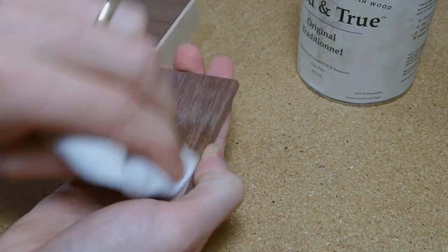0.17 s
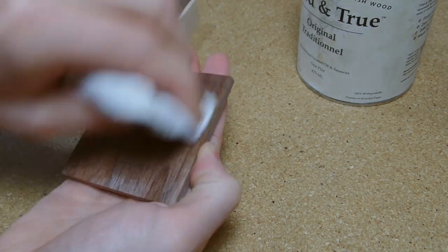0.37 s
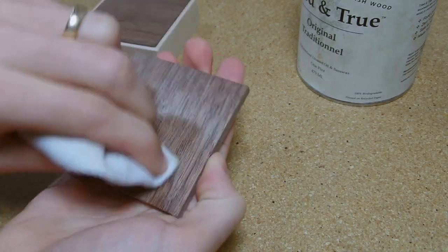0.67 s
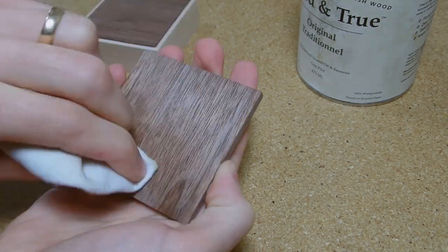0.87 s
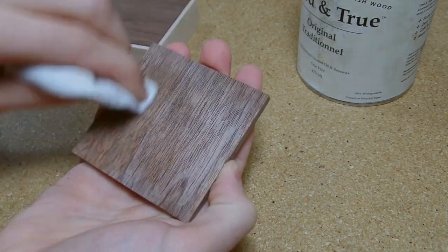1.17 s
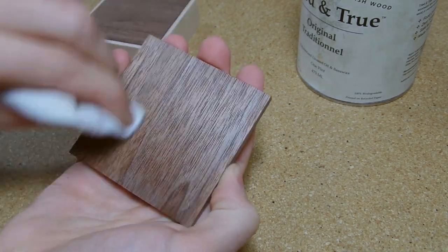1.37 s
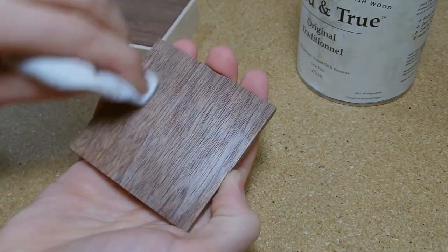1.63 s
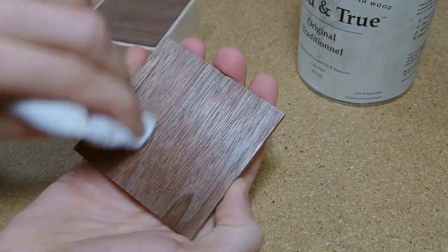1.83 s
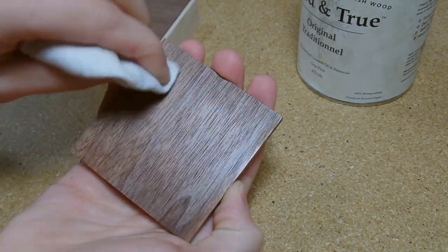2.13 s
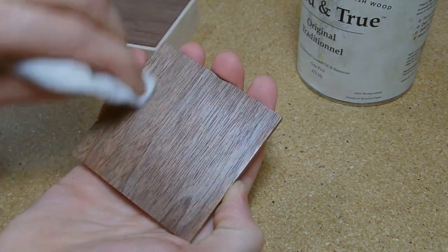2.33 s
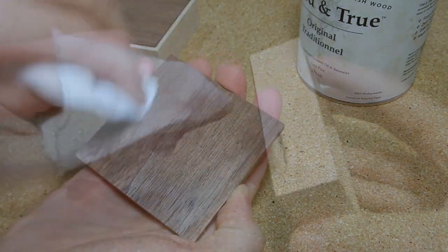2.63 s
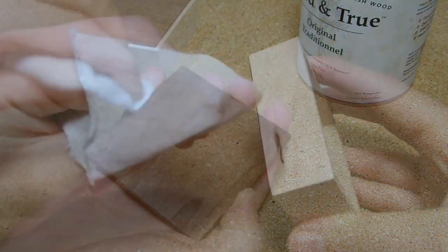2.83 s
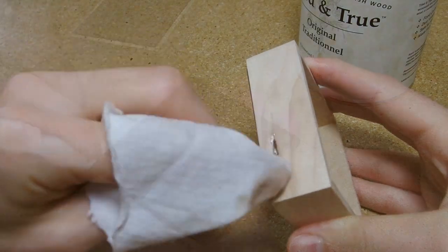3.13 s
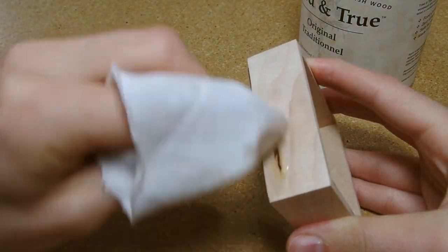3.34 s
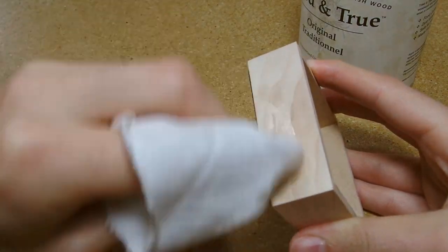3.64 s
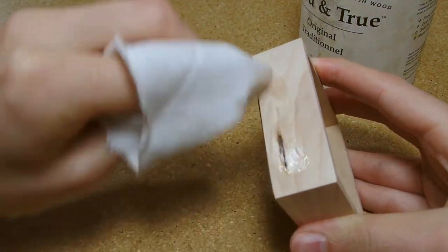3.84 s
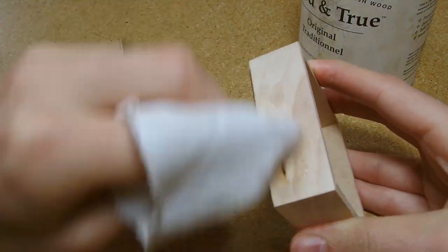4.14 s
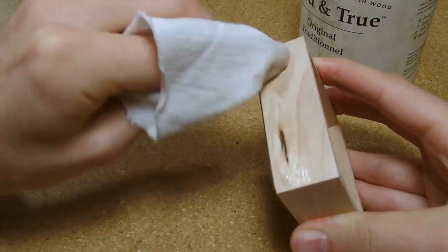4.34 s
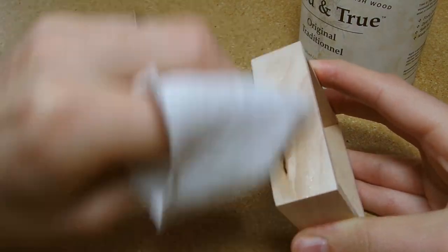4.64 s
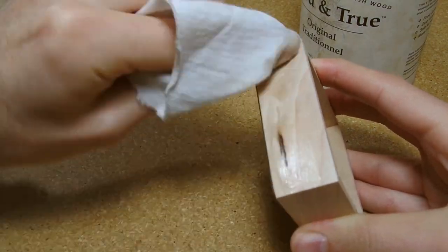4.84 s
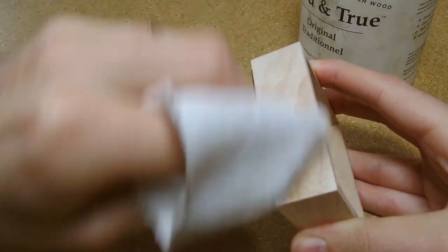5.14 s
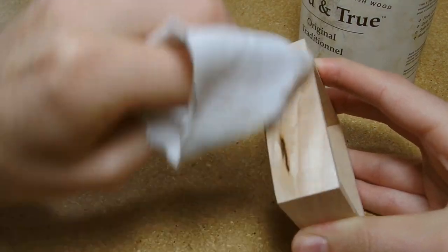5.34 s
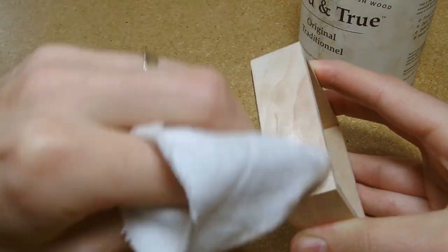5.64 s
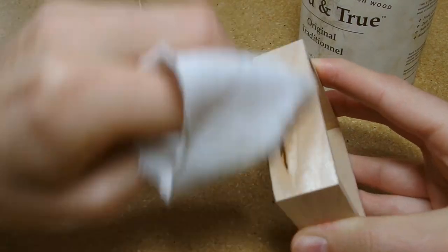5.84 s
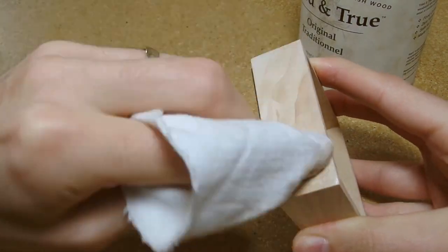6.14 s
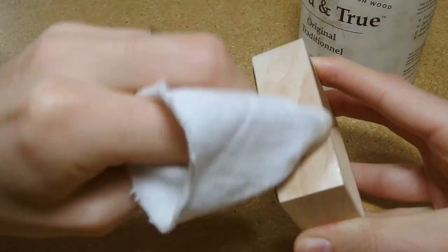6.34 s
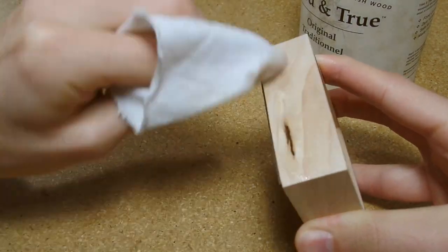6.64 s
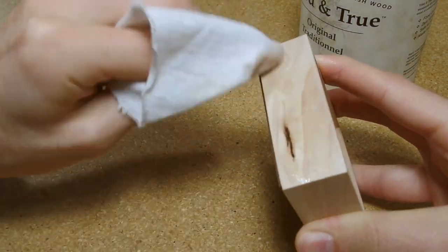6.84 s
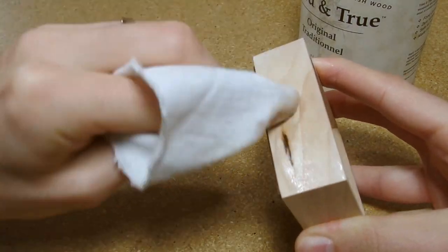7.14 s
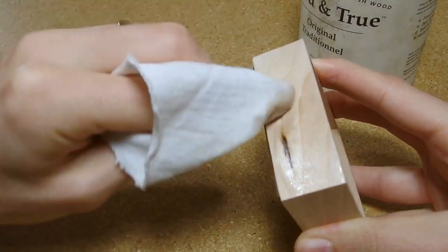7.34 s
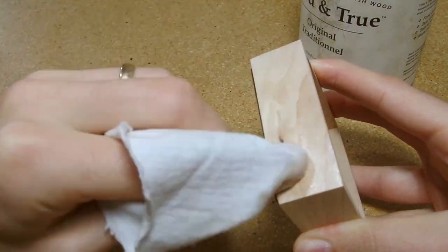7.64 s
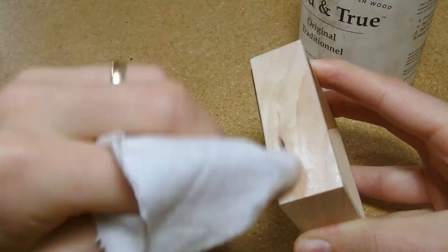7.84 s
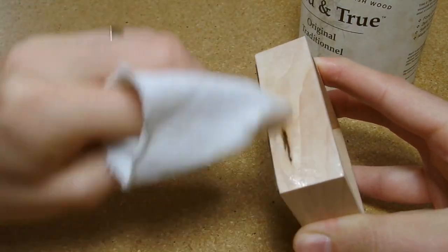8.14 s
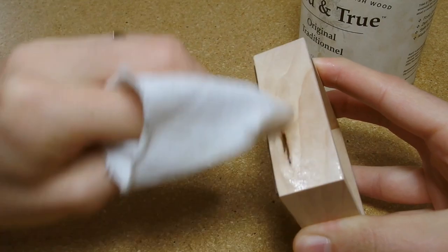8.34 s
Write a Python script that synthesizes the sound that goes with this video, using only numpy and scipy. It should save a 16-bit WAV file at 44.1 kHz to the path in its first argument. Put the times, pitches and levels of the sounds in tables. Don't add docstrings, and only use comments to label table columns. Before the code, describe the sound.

In a quiet workshop with soft hiss and low machine hum, cloth fizzes steadily back and forth over wood grain. After a short gap, hesitant dabs begin on a smaller, brighter piece, joined by soft then hard woody knocks against the bench and a couple of tiny crisp snaps. Firm regular rubbing continues, becoming shorter and uneven, dipping, then strengthening to the end. Dull scrapes occur underneath. Close, dry, mono.

```python
import sys
import numpy as np
from scipy import signal
from scipy.fft import rfft, irfft
from scipy.io import wavfile
from scipy.ndimage import uniform_filter1d

SR = 44100
rng = np.random.default_rng(int(sys.argv[2]) if len(sys.argv) > 2 else 0)


def invert_db(x):
    u = np.asarray(x, float) / 20
    return 10 ** u


def put_to_file(sound):
    columns = np.atleast_2d(sound).T
    safe = np.clip(columns, -1, 1)
    whole_steps = np.round(safe * 32767)
    wavfile.write(sys.argv[1], SR, whole_steps.astype(np.int16))


N = 374850
T = np.arange(N) / SR
HZ = np.fft.rfftfreq(N, 1 / SR)
EDGE_HZ = 15770


def evened(x):
    return x / np.sqrt(np.mean(x ** 2) + 1e-20)


def read(points, hz):
    f, value = np.transpose(points)
    return np.interp(np.log(hz + 1), np.log(f + 1), value)


def colour(x, gain):
    return irfft(rfft(x) * gain, N)


def wander(hz):
    return evened(colour(rng.standard_normal(N), 1 / (1 + (HZ / hz) ** 2)))


def add(mix, start_s, sound):
    part = mix[round(start_s * SR):][:len(sound)]
    part += sound[:len(part)]


def sine(hz, t):
    return np.sin(2 * np.pi * (hz * t + rng.random()))


# [start_s, end_s, pitch_hz, level_db]
HUM_SWELLS = [(0.56, 1.35, 147, -64), (1.3, 2.3, 145.3, -67), (2.25, 3.0, 150, -62),
              (1.737, 1.81, 319, -57), (2.7, 2.95, 301, -63), (3.25, 4.45, 134, -60),
              (5.75, 6.55, 136.3, -60), (6.75, 7.35, 136, -62), (7.9, 8.6, 136, -66),
              (2.87, 3.82, 121.3, -60), (3.92, 4.6, 120, -58), (4.622, 5.17, 119.2, -56),
              (5.28, 6.77, 117.8, -58.5), (6.9, 7.66, 119.5, -56.5), (7.702, 8.6, 119.6, -58.5),
              (-.1, 1.1, 58, -62.5), (1.899, 2.9, 57.3, -63), (3.851, 4.75, 58.6, -59),
              (5.399, 5.95, 59.7, -59.5), (6.101, 6.8, 59.5, -59.5), (7.195, 8.6, 60.2, -67)]


def hums():
    fade_s, waver_hz, swell_db = 0.069, 0.725, 1.1
    out, waver, swell = np.zeros(N), wander(4.9), wander(3.2)
    for start_s, end_s, pitch_hz, level_db in HUM_SWELLS:
        shift = rng.integers(N)
        edge_s = np.minimum(T - start_s, end_s - T)
        fade = np.clip(edge_s / np.minimum(fade_s, (end_s - start_s) / 3), 0, 1)
        on = fade > 0
        now_hz = pitch_hz + waver_hz * np.roll(waver, shift)[on]
        turns = np.cumsum(now_hz) / SR + rng.random()
        level = invert_db(level_db + swell_db * np.roll(swell, shift)[on])
        out[on] += np.sqrt(2) * fade[on] * level * np.sin(2 * np.pi * turns)
    return out


# [freq_hz, density_db_per_hz]
AIR_SPECTRUM = [(20, 3.5), (40, -2), (65, 4.5), (130, -2), (190, -11.5), (400, -10), (1200, -16),
                (2300, -18), (2700, -21), (8000, -25.5), (16500, -27)]
# [pitch_hz, level_db]
LAMP_TONES = [(1200, -69), (1320, -76)]


def workshop():
    change_s, change_length_s = 3.26, 0.57
    air_dbs, rumble_dbs = (-56, -55), (-59, -57)
    low = 1 / (1 + (HZ / 150) ** 8)
    second = np.clip((T - change_s) / change_length_s + 0.5, 0, 1)
    spectrum = invert_db(read(AIR_SPECTRUM, HZ))
    out = hums()
    for share, air_db, rumble_db in zip((1 - second, second), air_dbs, rumble_dbs):
        noise = rng.standard_normal(N)
        air = evened(colour(noise, spectrum * (1 - low))) * invert_db(air_db + 0.89 * wander(4.1))
        rumble = evened(colour(noise, spectrum * low)) * invert_db(rumble_db + 1.2 * wander(3))
        out = out + share * (air + rumble)
    for pitch_hz, level_db in LAMP_TONES:
        out = out + np.sqrt(2) * invert_db(level_db + 0.5 * wander(4)) * sine(pitch_hz, T)
    return out


# [freq_hz, level_db]
BENCH_SPECTRUM = [(100, -27), (170, 1.5), (250, -7), (330, 7.5), (420, -5.5), (660, -10.5), (800, -7),
                  (1200, -13), (2500, -18), (6000, -26)]
# [freq_hz, t60_s]
BENCH_DECAY = [(150, 0.27), (400, 0.34), (1000, 0.37), (3000, 0.05)]


def bench_noise(t, t60_scale):
    frame = dict(nperseg=512, noverlap=384)
    hz, at_s, z = signal.stft(rng.standard_normal(len(t)), SR, **frame)
    z = z * invert_db(read(BENCH_SPECTRUM, hz)[:, None])
    steady_rms = np.sqrt(np.mean(signal.istft(z, SR, **frame)[1] ** 2))
    t60_s = t60_scale * read(BENCH_DECAY, hz)[:, None]
    z = z * invert_db(-60 * at_s / t60_s)
    return signal.istft(z, SR, **frame)[1][:len(t)] / steady_rms


# [start_s, t60_s, level_db]
BENCH_SHUFFLES = [
    (0.171, 0.22, -51),
    (1.892, 0.16, -50.5),
    (2.11, 0.13, -59),
    (2.55, 0.13, -54),
    (3.0, 0.25, -63),
    (3.269, 0.31, -54.5),
    (6.22, .15, -52),
    (7.03, 0.35, -40.5),
    (7.661, 0.18, -63),
    (7.95, 0.27, -55),
]


def shuffles():
    rise_s = 0.022
    out, t = np.zeros(N), T[:SR // 3]
    for start_s, t60_s, level_db in BENCH_SHUFFLES:
        shape = np.minimum(t / rise_s, invert_db(-60 * (t - rise_s) / t60_s))
        add(out, start_s, invert_db(level_db) * shape * bench_noise(t, 30))
    return out


# [start_s, peak_db, pitch_hz]
BOX_KNOCKS = [
    (3.517, -25, 385),
    (3.785, -24.5, 386),
    (4.289, -17.5, 404),
    (4.56, -25, 404),
    (4.794, -17, 410),
    (5.044, -19, 402),
    (5.275, -17, 408),
    (5.502, -16, 412),
]
# [pitch_hz, level_db, t60_s]
RING_MODES = [(110, -15, .3), (170, -8, .25), (231, -8, .25), (325, -5, .2), (418, -1, .2), (512, -3, .2),
              (608, -4, .18), (797, -10, .18), (915, -12, .18), (1045, -21, .15), (1195, -16, .15),
              (1335, -20, .15), (1480, -22, .15), (1700, -22, .15)]


def knocks():
    out, t = np.zeros(N), T[:SR // 3]
    ring = sum(invert_db(level_db - 60 * t / t60_s) * sine(hz, t) for hz, level_db, t60_s in RING_MODES) / 2
    for start_s, peak_db, pitch_hz in BOX_KNOCKS:
        hard_db = -10.5 + 0.75 * (peak_db + 20.5)
        tail_db = -14.5 + 0.27 * (peak_db + 19.5)
        u = np.clip(t * pitch_hz / 2.764, 0, 1)
        blow = -np.sqrt(np.sin(np.pi * u)) * np.sin(2 * np.pi * pitch_hz * t * (1.1 - 0.13 * u))
        contact = np.exp(-t / 0.0057) * (1 - np.exp(-t / 0.00025))
        blow -= invert_db(hard_db) * np.sin(2 * np.pi * 800 * t) * contact
        wall = (t / 0.0078) * np.exp(1 - t / 0.0056)
        blow -= invert_db(-16) * np.sin(2 * np.pi * 590 * t) * wall
        click = signal.lfilter([0.3], [1, -0.7], rng.standard_normal(len(t))) * np.exp(-t / 0.0075)
        tail = (ring + invert_db(-5) * bench_noise(t, 1.0)) * np.clip((t - 0.006) / 0.006, 0, 1)
        sound = blow + invert_db(1.33 * hard_db - 3.5) * click + invert_db(tail_db) * tail
        add(sound, 0.0092, invert_db(-16) * blow)
        add(out, start_s + 0.00143, invert_db(peak_db) * sound)
    return out


# [start_s, level_db, pitch_hz, t60_s]
FIBRE_SNAPS = [
    (4.295, -50, 9900, 0.053),
    (4.458, -33.5, 9400, 0.065),
    (4.465, -30, 13800, 0.039),
    (4.55, -45, 9700, 0.066),
    (5.123, -36, 5500, 0.018),
    (5.595, -37, 6280, 0.0078),
]


def snaps():
    out, t = np.zeros(N), T[:3000]
    for start_s, level_db, pitch_hz, t60_s in FIBRE_SNAPS:
        noise = evened(uniform_filter1d(rng.standard_normal(len(t)), size=9))
        burst = noise * np.sin(2 * np.pi * pitch_hz * t)
        rise = np.minimum(t / (0.076 * t60_s), 1)
        add(out, start_s, invert_db(level_db - 60 * t / t60_s) * burst * rise)
    return out


def strokes(rows, grip):
    usual_db, ring_lag, scrape_lag = -45, 0.32, 0.38
    out = []
    for k, (start_s, length_s, fizz_db, *own) in enumerate(rows):
        late, ring_db, scrape_db = grip[k % 2]
        if own:
            late = own[0]
        harder_db = fizz_db - usual_db
        ring_db = ring_db - ring_lag * harder_db
        scrape_db = scrape_db - scrape_lag * harder_db
        out.append((start_s, length_s, fizz_db, late, ring_db, scrape_db))
    return out


def rub(moves, smooth, modes, grain_db, flicker_db):
    slips = rng.standard_normal(N) * invert_db(grain_db * np.minimum(rng.exponential(1, N), 4))
    rise_db = sum(db / (1 + (2 * (HZ - hz) / width_hz) ** 2) for hz, width_hz, db in modes)
    gain = invert_db(read(smooth, HZ) + rise_db) * (HZ < EDGE_HZ)
    above_low, above_high = [1 / (1 + (hz / (HZ + 1)) ** 24) for hz in (3150, 6900)]
    shares = (above_high, above_low - above_high, 1 - above_low)
    speed_power = np.array([[1.0], [0.85], [0.7]])
    power = np.zeros((3, N))
    for start_s, length_s, fizz_db, late, ring_db, scrape_db in moves:
        part = slice(max(round(start_s * SR), 0), round((start_s + length_s) * SR))
        speed = np.sin(np.pi * np.clip((T[part] - start_s) / length_s, 0, 1) ** late)
        level = invert_db(fizz_db + np.array([[0], [ring_db], [scrape_db]]))
        power[:, part] += (speed ** speed_power * level) ** 2
    layers = []
    for share in shares:
        layers.append(evened(colour(slips, gain * np.sqrt(share))) * invert_db(flicker_db * wander(36)))
    return (np.sqrt(power) * layers).sum(0)


# [start_s, length_s, fizz_db, lateness_power, ring_db_re_fizz, scrape_db_re_fizz]
SWISH_STROKE = [
    (2.896, 0.23, -57.5, 0.54, -2, 0.5),
]
# [freq_hz, density_db_per_hz]
SWISH_SPECTRUM = [(300, -7), (1500, -11), (3000, -8), (5100, 6), (5700, -9), (7200, -12), (8300, -4),
                  (9200, -9), (16000, -6)]


def swish():
    return rub(SWISH_STROKE, SWISH_SPECTRUM, [], 1.5, 0.8)


# [start_s, length_s, fizz_db]
LID_MOVES = [(-0.028, 0.045, -47), (0.022, 0.1, -45), (0.134, 0.12, -45), (0.244, 0.12, -45),
             (0.371, 0.118, -45), (0.491, 0.097, -46), (0.595, 0.13, -43), (0.715, 0.098, -43),
             (0.811, 0.13, -43.5), (0.926, 0.11, -46.5), (1.038, 0.11, -44.5), (1.151, 0.1, -46.9),
             (1.258, 0.11, -46.5), (1.374, 0.1, -46), (1.484, 0.11, -45.5), (1.608, 0.1, -49),
             (1.719, 0.11, -45.6), (1.843, 0.11, -45.5), (1.956, 0.12, -44.5), (2.078, 0.11, -45.5),
             (2.196, 0.11, -45), (2.313, 0.1, -46), (2.418, 0.11, -43.5), (2.533, 0.11, -45),
             (2.652, 0.1, -43), (2.767, 0.098, -45.5), (2.877, 0.031, -51.5)]
LID_PAD_GRIP = [(1.05, -8, -13), (0.79, -7.5, -10)]
# [freq_hz, density_db_per_hz]
LID_SPECTRUM = [(200, -21), (700, -12), (1600, -15), (2400, -12), (3400, -13), (5300, -12), (7000, -11.5),
                (9500, 0), (11500, 1), (13000, 5), (14500, 5), (16000, 5)]
# [pitch_hz, width_hz, rise_db]
LID_RESONANCES = [(1564, 460, 10.5), (3080, 320, -3), (4330, 210, 3.5), (5970, 870, 6), (7670, 390, 6.5),
                  (8500, 210, 4)]


def lid_rub():
    return rub(strokes(LID_MOVES, LID_PAD_GRIP), LID_SPECTRUM, LID_RESONANCES, 2.7, 1.4)


# [start_s, length_s, fizz_db, lateness_power]
DAB_MOVES = [
    (3.149, 0.12, -62.5, 4),
    (3.311, 0.13, -53.5, 1.3),
    (3.441, 0.15, -54.5, 1.4),
    (3.557, 0.158, -45, 2.25),
    (3.717, 0.129, -52.5, 0.82),
    (3.83, 0.135, -42.5, 1.7),
    (3.978, 0.11, -47.1, 0.7),
    (4.132, 0.098, -49, 0.95),
    (4.249, 0.11, -48, 0.96),
    (4.351, 0.13, -46.5, 1.3),
]
# [start_s, length_s, fizz_db]
FACE_MOVES = [(4.502, 0.1, -41.7), (4.627, 0.12, -45), (4.754, 0.1, -39.5), (4.885, 0.11, -41),
              (5.008, 0.1, -39.5), (5.133, 0.11, -40.5), (5.243, 0.11, -37), (5.371, 0.094, -40.5),
              (5.474, 0.11, -40.5), (5.6, 0.092, -41.5), (5.708, 0.11, -40.5), (5.842, 0.11, -44),
              (5.955, 0.11, -41), (6.079, 0.11, -41.5), (6.197, 0.098, -39), (6.317, 0.1, -43),
              (6.416, 0.11, -42), (6.529, 0.096, -45)]
# [start_s, length_s, fizz_db, lateness_power]
CORNER_MOVES = [(6.645, 0.086, -43, 0.49), (6.72, 0.089, -43.5, 1.7), (6.832, 0.085, -44, 0.59),
                (6.912, 0.091, -44, 1.8), (7.026, 0.087, -42, 0.5), (7.114, 0.085, -46, 1.1),
                (7.217, 0.067, -45.5, 0.74), (7.31, 0.079, -48, 0.83), (7.403, 0.08, -48, 0.71),
                (7.52, 0.083, -50, 1.04), (7.632, 0.088, -47, 0.69), (7.685, 0.12, -47.5, 0.89),
                (7.82, 0.091, -42, 1.3), (7.935, 0.086, -41.5, 0.76), (8.037, 0.093, -42.5, 0.9),
                (8.143, 0.099, -42, 1.08), (8.256, 0.11, -42, 0.94), (8.376, 0.082, -41, 0.97),
                (8.466, 0.055, -43.5, 2.1)]
DAB_PAD_GRIP = [(1.01, -12, -10.5), (1.01, -11.5, -12)]
FACE_PAD_GRIP = [(0.84, -8, -12), (0.86, -7.5, -10.5)]
CORNER_PAD_GRIP = [(1.01, -10.5, -10.5), (1.01, -11, -11)]
# [freq_hz, density_db_per_hz]
BOX_SPECTRUM = [(200, -11.5), (700, -10.5), (1600, -12), (3000, -12), (4700, -4.5), (5700, -9.5),
                (7600, -5), (9500, 2), (12000, 2.5), (14500, 5.5), (16000, 2.5)]
# [pitch_hz, width_hz, rise_db]
BOX_RESONANCES = [(2594, 310, 8.5), (3547, 160, 11.5), (4210, 470, 13.5), (5020, 200, -3), (6054, 1200, 14),
                  (6770, 250, -9), (8100, 290, 2.5), (9900, 190, 3.5)]


def box_rub():
    moves = strokes(DAB_MOVES, DAB_PAD_GRIP)
    moves += strokes(FACE_MOVES, FACE_PAD_GRIP)
    moves += strokes(CORNER_MOVES, CORNER_PAD_GRIP)
    return rub(moves, BOX_SPECTRUM, BOX_RESONANCES, 1.74, 0.98)


def patchy(x, depth_db):
    z = signal.stft(x, nperseg=256)[2]
    patches = rng.standard_normal(z.shape)
    patches = uniform_filter1d(uniform_filter1d(patches, size=4, axis=0), size=34, axis=1)
    return signal.istft(z * invert_db(depth_db * evened(patches)), nperseg=256)[1][:N]


def room(x, t60_s):
    t = T[:SR // 4]
    tail = rng.standard_normal(len(t)) * invert_db(-60 * t / t60_s) * (t > 0.003)
    return signal.oaconvolve(x, tail / np.linalg.norm(tail))[:N]


def scene():
    cloth = patchy(lid_rub() + box_rub() + swish(), 2.1) + snaps()
    mono = workshop() + shuffles() + knocks() + cloth + invert_db(-10.5) * room(cloth, 0.1)
    return np.array([mono, mono])


def drop_faint(x, under_db):
    frame = dict(nperseg=2048, noverlap=1536)
    hz, _, z = signal.stft(x, SR, **frame)
    power = uniform_filter1d(uniform_filter1d(abs(z) ** 2, size=4, axis=0), size=2, axis=1)
    mean = power[(hz > 1000) & (hz < EDGE_HZ)].mean(0)
    faint = (power < mean * invert_db(-2 * under_db)) & (hz[:, None] > 1300)
    return signal.istft(z * np.where(faint, 0.03, 1), SR, **frame)[1][:N]


def top_cut(x):
    return signal.sosfilt(signal.butter(12, 16900, fs=SR, output="sos"), x)


def record(dry):
    limited = drop_faint(colour(dry[0], HZ < EDGE_HZ), 9.3)
    return top_cut(np.array([limited, limited]))


dry = scene()
out = record(dry)
put_to_file(out)
```